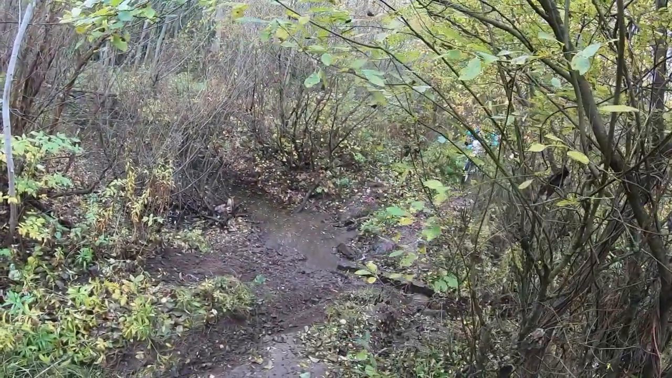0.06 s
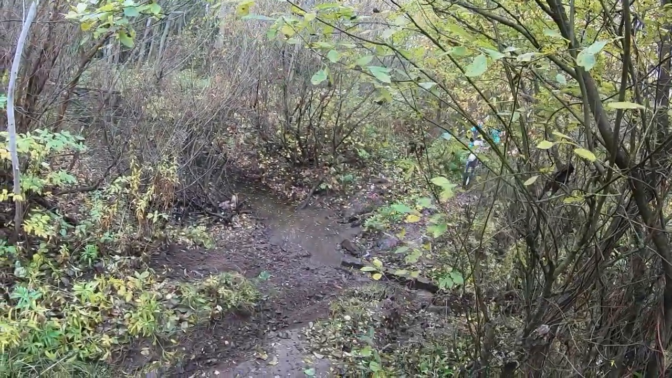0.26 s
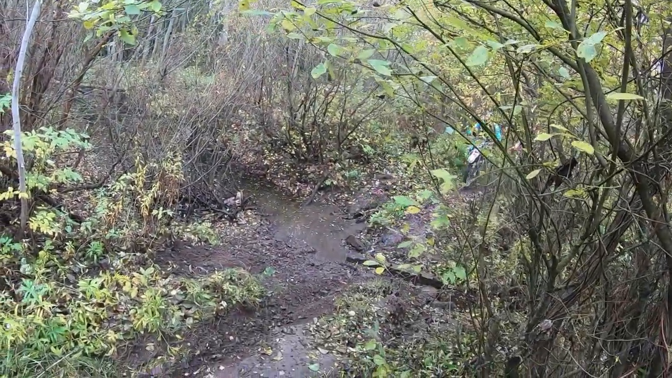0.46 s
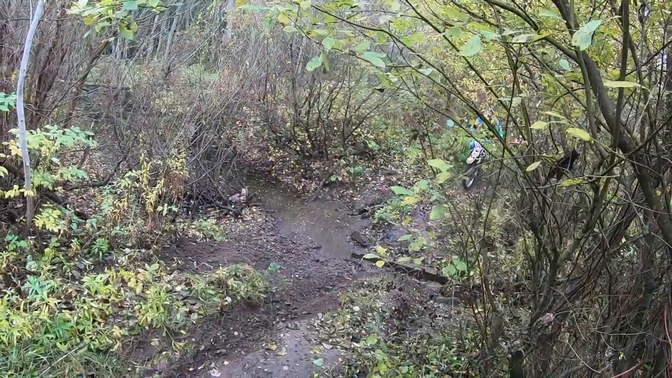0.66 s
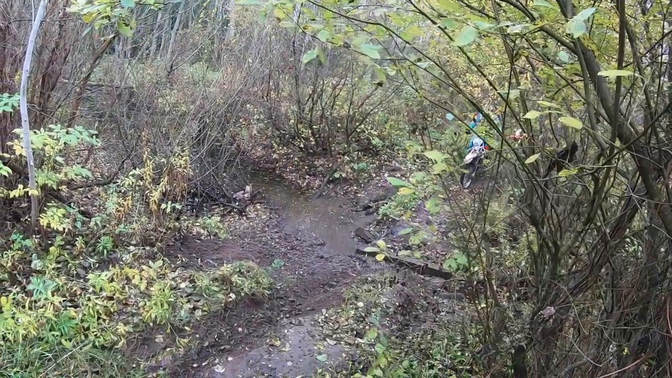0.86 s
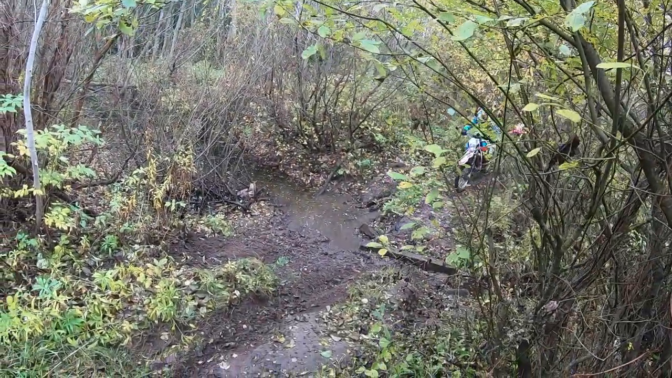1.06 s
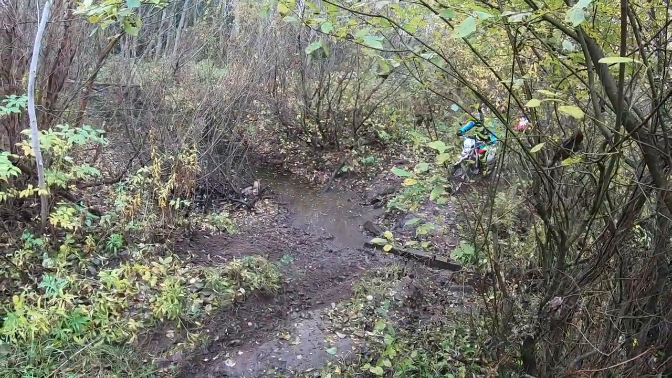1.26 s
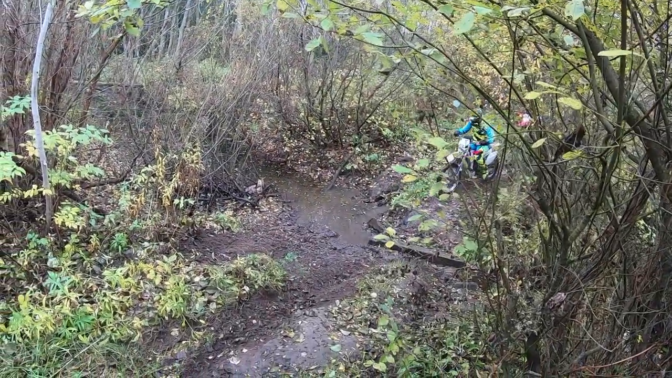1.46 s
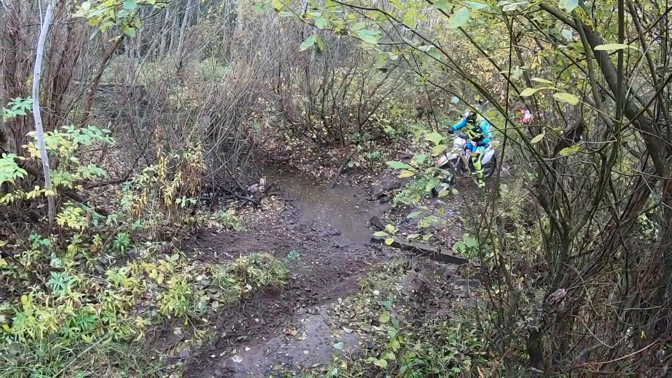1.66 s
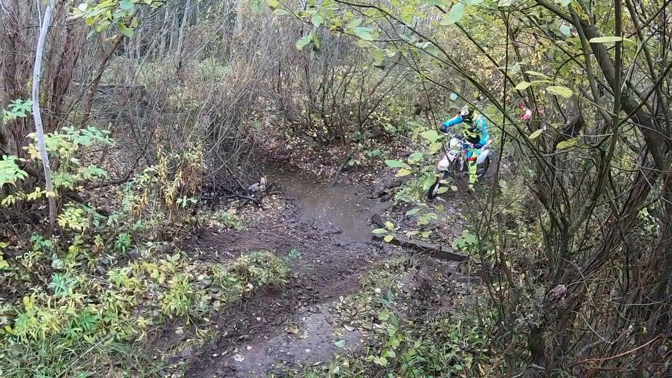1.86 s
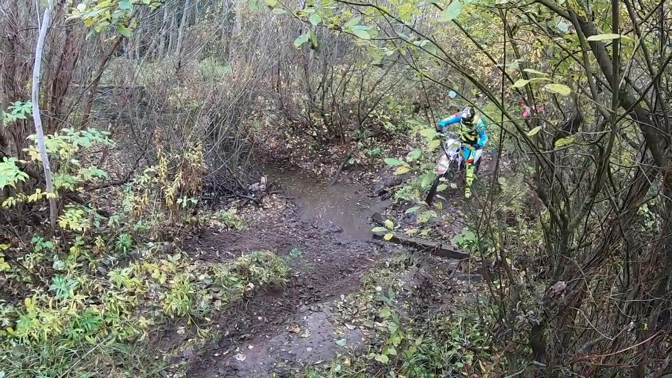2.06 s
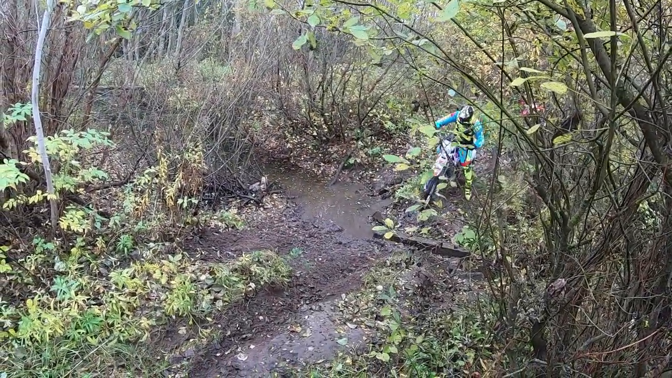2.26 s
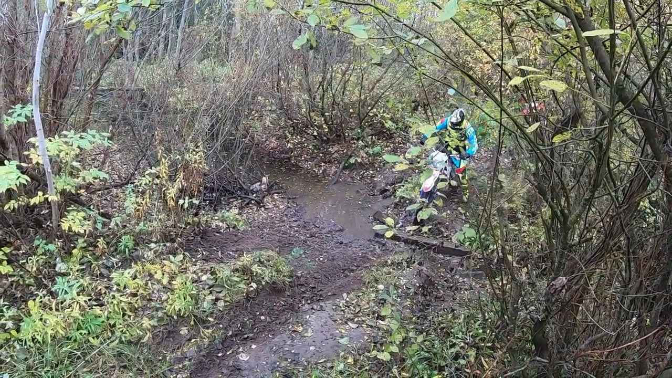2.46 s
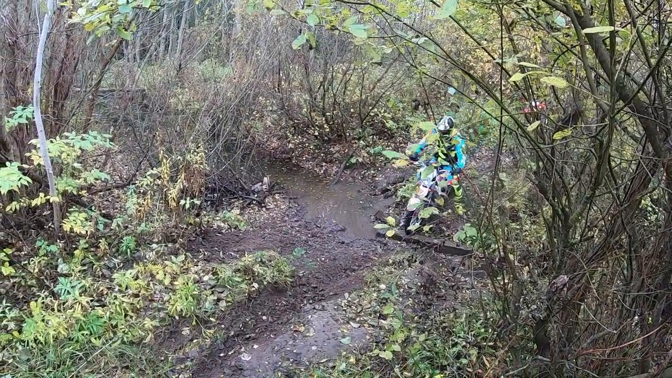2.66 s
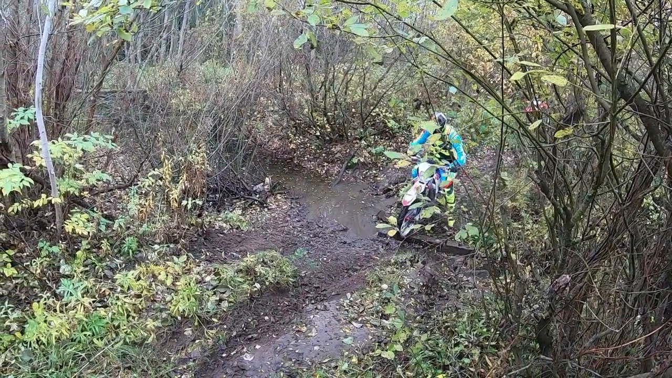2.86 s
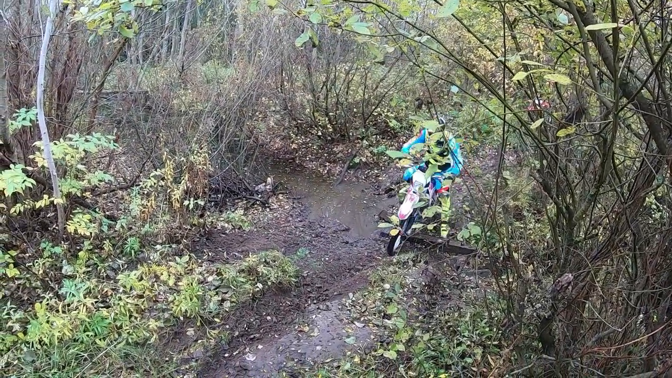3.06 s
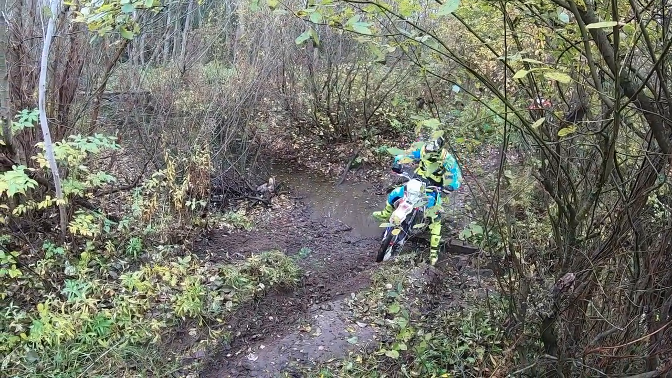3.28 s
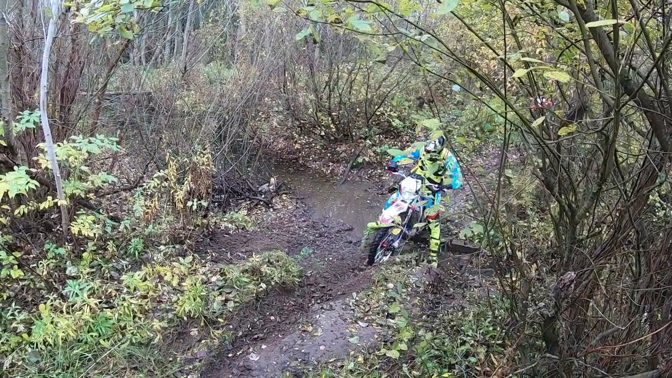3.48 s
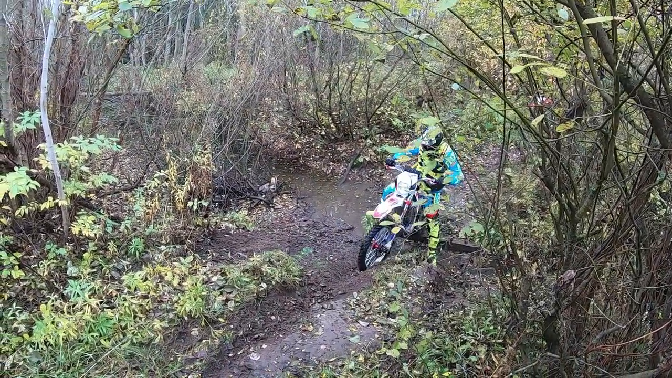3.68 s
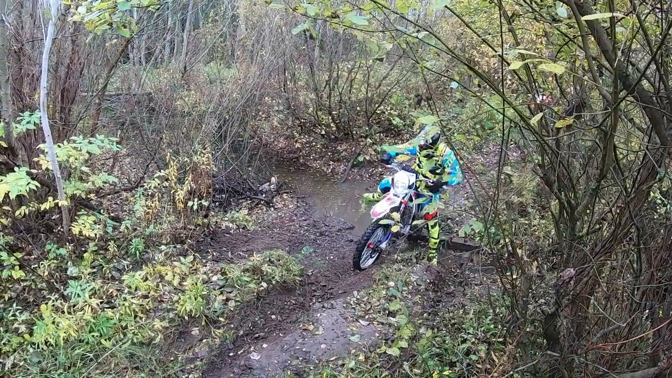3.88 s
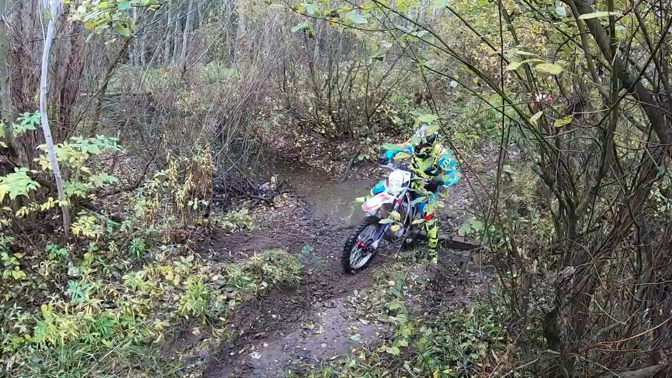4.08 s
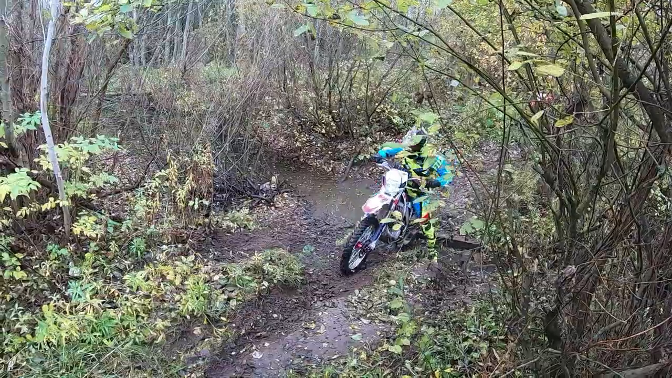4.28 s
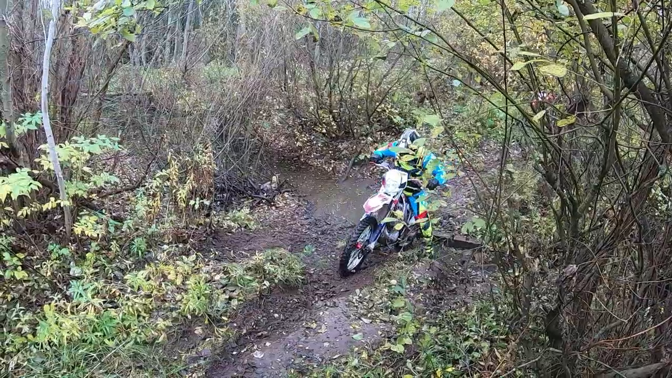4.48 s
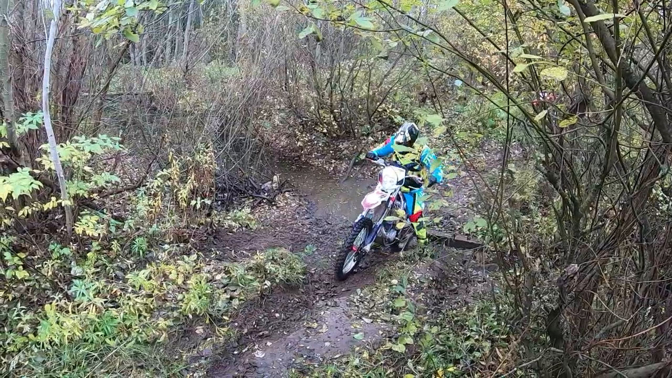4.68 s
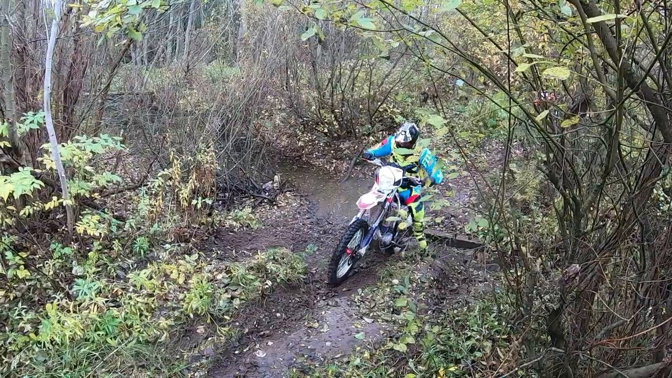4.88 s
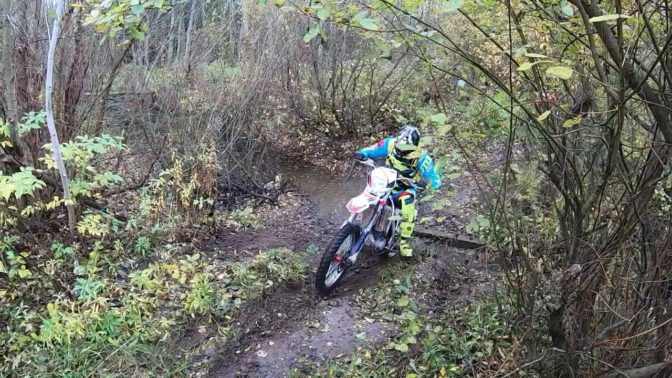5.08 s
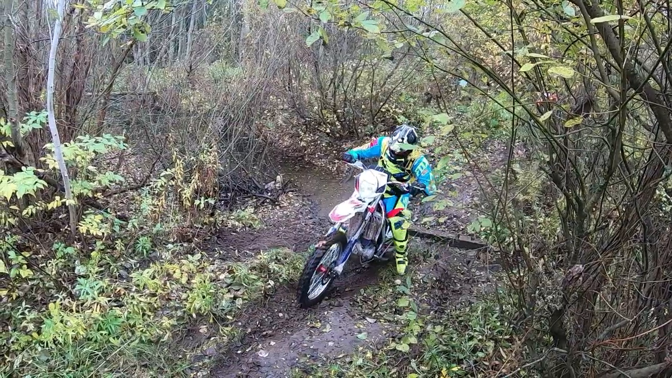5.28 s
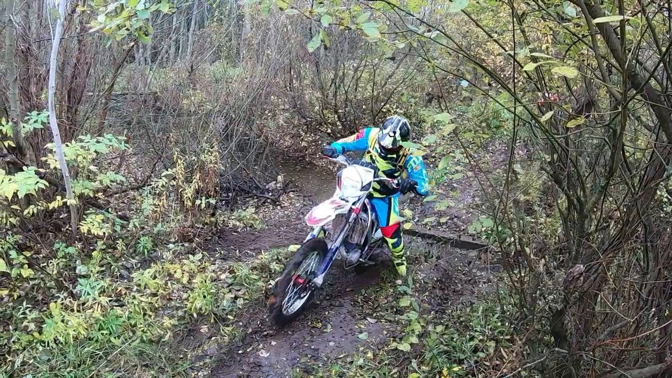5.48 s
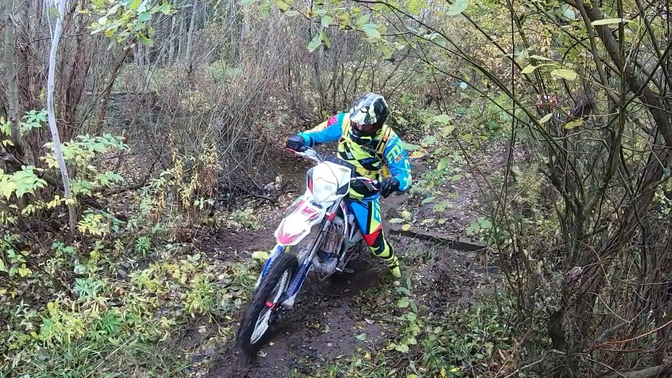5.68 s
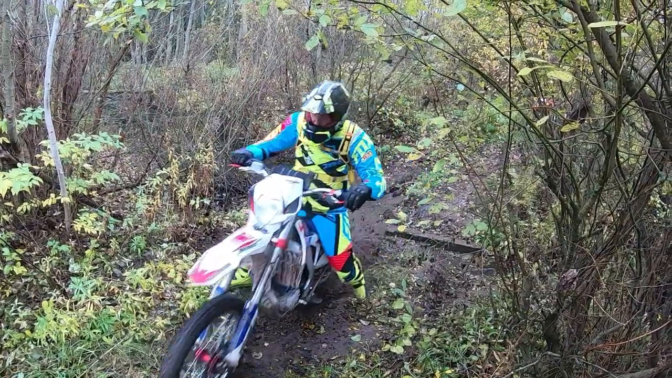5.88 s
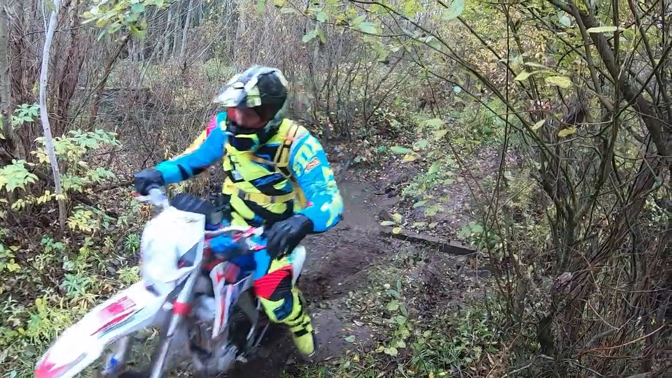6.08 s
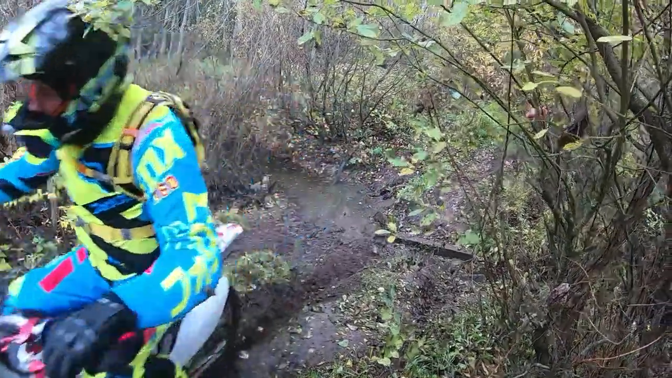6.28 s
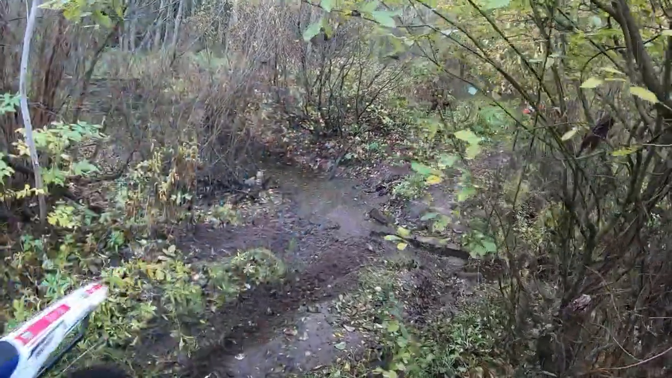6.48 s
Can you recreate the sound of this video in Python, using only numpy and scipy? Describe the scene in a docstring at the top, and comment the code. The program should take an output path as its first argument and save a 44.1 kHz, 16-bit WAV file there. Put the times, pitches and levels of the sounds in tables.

```python
"""A single-cylinder four-stroke dirt bike chugs down a muddy forest trail toward the microphone.
It almost stalls at a log, then is revved in several bursts and comes close.
Each firing is one pressure pulse, thumping and barking through the silencer; gated noise makes the rasp.
Resonant metal rattles, short hard clacks break in, a puddle froths with bubbles and a faint whine wanders.
The trees add a short echo, the mud a reflection, and a steady noise is the forest behind it all."""
import sys
import numpy as np
from scipy import signal
from scipy.fft import rfft, irfft, next_fast_len
from scipy.io import wavfile
from scipy.ndimage import uniform_filter1d, map_coordinates

SR = 44100
rng = np.random.default_rng(int(sys.argv[2]) if len(sys.argv) > 2 else 0)


def store_pcm(level_fs):
    """Save levels as 16-bit WAV."""
    pcm = np.round(np.clip(level_fs, -1, 1) * 32767).astype(np.int16)
    wavfile.write(sys.argv[1], SR, np.atleast_2d(pcm).T)


N = 288414


def amp(db):
    """Decibels to gain."""
    return 10 ** (np.asarray(db) / 20)


def unit(x):
    """Scale to rms 1."""
    return x / np.sqrt(np.mean(x ** 2) + 1e-20)


def along(points, hz):
    """Read (Hz, value) points on a log frequency axis."""
    f, v = np.transpose(points)
    return np.interp(np.log(hz + 1), np.log(f + 1), v)


def curves(rows):
    """One value per sample for each column after the time in seconds."""
    s, *cols = np.transpose(rows)
    return [np.interp(np.arange(N) / SR, s, c) for c in cols]


def filtered(x, response):
    """x times a response of frequency."""
    m = next_fast_len(N + SR // 2)
    return irfft(rfft(x, m) * response(np.fft.rfftfreq(m, 1 / SR)), m)[..., :N]


def coloured(x, spectrum):
    """x through a (Hz, dB) spectrum, at rms 1."""
    return unit(filtered(x, lambda hz: amp(along(spectrum, hz))))


# How alike left and right sound at the microphones.
# Each row: frequency in Hz, likeness from 0 (unrelated) to 1 (the same).
ALIKE = [(100, 1), (500, 0.96), (1200, 0.35), (2500, 0.79), (4500, 0.83), (8000, 0), (14000, 0.027)]


def spread(pair):
    """Two unrelated signals become left and right, alike in the bass."""
    turn = lambda hz: np.arccos(np.clip(along(ALIKE, hz), -1, 1)) / 2
    mid, side = filtered(pair, lambda hz: np.array([np.cos(turn(hz)), np.sin(turn(hz))]))
    return np.array([mid + side, mid - side])


def noise():
    """Stereo white noise, spread between the channels."""
    return spread(rng.standard_normal((2, N)))


def causal(gain):
    """The minimum-phase pulse with this spectrum: it starts sharply and rings out."""
    cepstrum = irfft(np.log(np.maximum(gain, 1e-6)))
    half = cepstrum.shape[-1] // 2
    # fold the cepstrum onto positive time
    cepstrum[..., 1:half] *= 2
    cepstrum[..., half + 1:] = 0
    return irfft(np.exp(rfft(cepstrum)))


def add(track, start, sound):
    """Mix a sound into a track at a sample."""
    part = track[..., start:start + sound.shape[-1]]
    part += sound[..., :part.shape[-1]]


def moments(cycle, angle):
    """Samples at which the engine passes this share of its cycle."""
    return np.flatnonzero(np.diff(np.floor(cycle - angle)) > 0)


def bursts(cycle, angle, decay, scatter_db):
    """An envelope kicked once a cycle, by a varying height, that dies away over decay seconds."""
    at = moments(cycle, angle)
    kicks = np.zeros(N)
    kicks[at] = amp(scatter_db * rng.standard_normal(len(at)))
    return signal.lfilter([1], [1, -np.exp(-1 / (decay * SR))], kicks)


def levelled(envelope):
    """An envelope with its slow swell taken out."""
    power = uniform_filter1d(uniform_filter1d(envelope ** 2, size=6000), size=6000)
    return envelope / np.sqrt(np.abs(power) + 1e-9)


def case(x, modes):
    """The ring of metal housings, which radiate little high treble."""
    def ring(f):
        total = 0
        for k, (centre, width, db) in enumerate(modes):
            # neighbouring modes alternate in sign
            resonance = 1j * f * width / (centre ** 2 - f * f + 1j * f * width)
            total = total + (-1) ** k * amp(db) * resonance
        return total

    return unit(filtered(x, lambda f: ring(f) / (1 + (f / 7000) ** 6)))


def held(start, end, lag):
    """An envelope that eases to 1 after start and back to 0 after end."""
    t = np.arange(N) / SR
    ease = lambda s: 1 - np.exp(-np.maximum(t - s, 0) / lag)
    return ease(start) - ease(end)


# What the rider does with the throttle.
# Each row: start in seconds, end in seconds, opening with 1 = full.
THROTTLE = [(0.184, 0.37, 0.29), (0.728, 0.944, 0.22), (2.72, 3.08, 0.28), (3.52, 3.75, 0.21),
            (3.743, 3.892, 1), (3.89, 4.1, 0.35), (4.188, 4.543, 0.75), (4.65, 4.973, 0.91),
            (4.978, 5.23, 0.61), (5.227, 5.694, 0.77), (5.697, 5.9, 0.37), (5.876, 6.403, 0.43)]
# The distance closing as the bike comes nearer through the bushes.
# Each row: time in seconds, relative gain in dB.
NEARNESS = [(0, 2.5), (.6, 2), (1.3, 2), (2.6, 5.5), (3.6, 2.5), (4.3, 7.5), (5.3, 10), (5.9, 9.5),
            (6.3, 12), (6.54, 13.5)]
THROTTLE_LAG_S = 0.026
IDLE_PER_S = 14.8  # firings per second


def loudness(law, rate):
    """Level in dB of one voice of the engine, from revs, throttle and nearness."""
    idle_db, db_per_octave, throttle_db, nearness_share = law
    opening = sum(amount * held(start, end, THROTTLE_LAG_S) for start, end, amount in THROTTLE)
    revs_db = db_per_octave * np.log2(rate / IDLE_PER_S)
    return idle_db + revs_db + throttle_db * opening + nearness_share * curves(NEARNESS)[0]


# The hush of the forest around the microphone.
# Each row: frequency in Hz, relative level in dB.
FOREST = [(20, -16), (90, 8), (200, -1), (400, -9), (900, -17.5), (2500, -22.5), (7000, -44), (10000, -35),
          (15000, -65)]


def forest(level_db):
    """Steady noise, heaviest in the bass, is the air of the place."""
    return amp(level_db) * coloured(noise(), FOREST)


# The engine's pace along the trail.
# Each row: time in seconds, firings per second.
FIRING = [(0.0, 20.08), (0.2, 18.95), (0.4, 36.06), (0.52, 35.9), (0.63, 28.19), (0.77, 18.53),
          (0.9, 25.62), (1.03, 21.07), (1.22, 14.18), (1.36, 13.78), (1.47, 10.9), (1.72, 10.34),
          (1.95, 14.97), (2.04, 11.64), (2.25, 13.19), (2.5, 12.6), (2.61, 10.93), (2.74, 12.94),
          (2.95, 20.19), (3.11, 23.6), (3.2, 18.29), (3.35, 14.42), (3.48, 15.4), (3.6, 11.67),
          (3.72, 14.55), (3.82, 33.7), (3.92, 43.34), (4.02, 36.16), (4.16, 28.26), (4.24, 37.45),
          (4.3, 46.01), (4.4, 47.78), (4.49, 53.72), (4.54, 46.76), (4.59, 38.44), (4.66, 37.29),
          (4.73, 37.87), (4.83, 52.05), (4.91, 57.24), (4.97, 60.18), (5.08, 51.77), (5.17, 46.88),
          (5.24, 47.14), (5.31, 48.47), (5.42, 52.93), (5.52, 54.86), (5.68, 50.15), (5.77, 41.1),
          (5.87, 29.73), (6.0, 29.73), (6.16, 27.64), (6.28, 30.42), (6.38, 34.05), (6.46, 24.18),
          (6.54, 25.6)]


def engine():
    """The firing rate, and its running sum: the cycles turned so far."""
    rate = curves(FIRING)[0]
    # firings lead by about 1 ms, after an offset of 0.15 cycle
    cycle = np.cumsum(rate) / SR + .001 * rate - .15
    return rate, cycle


# The low thump of the firings.
# Each row: time in seconds, relative level in dB, centre in Hz.
THUMPING = [(0.006, -24.5, 99.5), (0.257, -21, 123), (0.505, -23.5, 121), (0.625, -21, 94),
            (0.888, -19, 112), (0.928, -25, 110), (1.017, -20.5, 84.6), (1.117, -24.5, 99),
            (2.536, -22, 100.0), (2.625, -25.5, 92.0), (2.786, -20, 94), (3.004, -17.5, 104),
            (3.137, -18, 88.0), (3.438, -33.5, 85), (3.578, -20.5, 85), (3.729, -20, 89), (3.776, -16, 132),
            (4.139, -19, 119), (4.349, -18, 158), (4.452, -16.5, 112), (4.55, -20, 128), (4.574, -19, 108),
            (4.6, -20, 147), (4.86, -15.5, 121), (5.13, -20, 94), (5.299, -16, 132), (5.359, -18, 108),
            (5.492, -19, 120), (5.642, -19, 107), (5.702, -19, 146), (6.089, -17, 130.6),
            (6.42, -20.5, 117.0), (6.461, -18.0, 84.5), (6.497, -19.5, 108)]
# The silencer's voice above the thump.
# Each row: time in seconds, relative bark level in dB, bark centre in Hz, relative bray level in dB.
BARKING = [(0.006, -42.5, 250, -53.5), (0.332, -34.5, 248, -53), (0.753, -42.5, 270, -53.5),
           (0.888, -38.5, 280, -40.5), (1.017, -50, 270, -60), (1.247, -47, 244, -58),
           (2.066, -37.5, 220.0, -60.5), (2.625, -43, 241, -57.5), (3.05, -34.5, 273, -46.2),
           (3.242, -54.5, 274.0, -59), (3.729, -28.5, 239, -53), (3.868, -15, 301, -28),
           (3.893, -29.5, 234.0, -41), (3.965, -23.2, 212.0, -37), (4.017, -40, 238, -38.5),
           (4.174, -31, 237.0, -49.8), (4.234, -21.5, 291, -30.5), (4.55, -22.5, 290, -29.5),
           (4.574, -26.5, 230, -39.5), (4.822, -16.5, 305, -29.5), (4.965, -22.6, 265, -35.5),
           (5.052, -19.5, 244, -31), (5.193, -21, 293, -36), (5.379, -12.5, 250, -33),
           (5.418, -16.5, 279.0, -39.5), (5.723, -18.5, 257, -34.5), (5.769, -17.5, 208, -35),
           (5.822, -28.0, 270, -37.5), (6.358, -24.5, 298, -31.5), (6.461, -29.5, 286, -37.5),
           (6.497, -24.5, 265, -36.3)]
# Pulse shapes that slide with their centre.
# Each row: frequency as a multiple of the centre, relative level in dB.
THUMP = [(.12, -38), (.25, -23), (.42, -9), (.7, -2), (1, -0.5), (1.3, -1.5), (1.55, -9), (1.85, -15.5),
         (2.4, -28), (5, -70), (12, -140)]
BARK = [(.4, -52), (.58, -16), (.74, 1.5), (1, 0.5), (1.2, -1.5), (1.36, -8), (1.55, -24), (2.4, -57),
        (6, -140)]
# Pulse shapes that stay put.
# Each row: frequency in Hz, relative level in dB.
BRAY = [(250, -50), (390, -6), (460, 4.5), (565, 1.5), (660, -14.5), (1000, -36), (2000, -90), (4000, -140)]
CRACK = [(300, -41), (520, -14), (670, 4), (900, 1), (1130, 2.5), (1300, -1), (1600, -3), (4000, -26.5),
         (9000, -110)]
# How loud the crack grows.
# The row: idle level in dB, dB per octave of revs, dB at full throttle, share of the nearness.
CRACK_LAW = (-65, 6, 16, 1.08)
# below this many firings per second the resonances narrow, by these powers
WIDE_PER_S, THUMP_NARROWS, BARK_NARROWS = 39.6, 0.14, 0.48


def exhaust(cycle, rate, thump_db, bark_db, bray_db, scatter_db, size=8192):
    """One pressure pulse per firing: thump, bark and bray, and a sharp crack as the throttle opens."""
    hz = np.fft.rfftfreq(size, 1 / SR)
    at = moments(cycle, 0)
    controls = curves(THUMPING) + curves(BARKING) + [loudness(CRACK_LAW, rate)]
    thump, thump_centre, bark, bark_centre, bray, crack = [c[at][:, None] for c in controls]
    slow = np.maximum(WIDE_PER_S / rate[at], 1)[:, None]
    thump_shape = along(THUMP, (hz / thump_centre) ** (slow ** THUMP_NARROWS))
    bark_shape = along(BARK, (hz / bark_centre) ** (slow ** BARK_NARROWS))
    voices = [(thump_shape, thump + thump_db), (bark_shape, bark + bark_db),
              (along(BRAY, hz), bray + bray_db), (along(CRACK, hz), crack)]
    power = 0
    for shape, db in voices:
        # each shape is scaled to mean power 1 before its level
        power = power + amp(shape + db) ** 2 / np.mean(amp(shape) ** 2, axis=-1, keepdims=True)
    pulses = causal(np.sqrt(power))
    # slow running burns unevenly
    unevenness = (rate.min() / rate[at]) ** 2
    strength = amp(scatter_db * unevenness * rng.standard_normal(len(at)))
    out = np.zeros(N)
    for start, pulse in zip(at, pulses * strength[:, None]):
        period = SR / rate[start]
        add(out, start, pulse * np.sqrt(period))
    return out


def chambers(x, delay, bounce):
    """Reflections inside the silencer spread each pulse in time without colouring it (an all-pass)."""
    trip = lambda hz: np.exp(-2j * np.pi * hz * delay)
    return filtered(x, lambda hz: (bounce + trip(hz)) / (1 + bounce * trip(hz)))


# Torn gas and top-end sizzle.
# Each row: frequency in Hz, relative level in dB.
GAS = [(300, -6), (500, -6.5), (650, -9), (930, -5.5), (1100, -3.5), (1300, -3), (1500, 1.5), (1950, -1.5),
       (2210, -10.5), (2760, -2), (3360, -9.5), (4020, -5), (4600, -11.5), (5500, -14.5), (8000, -50)]
SIZZLE = [(2500, -14), (4300, -9.5), (5300, -5.5), (6700, 0.5), (7700, -1), (8400, -10), (9700, -6.5),
          (10400, -12), (11300, -21.5), (14000, -26), (15600, -45)]
# Engine case resonances.
# Each row: centre in Hz, width in Hz, relative level in dB.
CASE = [(1090, 98, -9), (1394, 115, 7), (1996, 270, 5), (3040, 420, 5.5), (4020, 5300, -9.5)]
# How loud rasp and sizzle grow.
# The row: idle level in dB, dB per octave of revs, dB at full throttle, share of the nearness.
RASP_LAW = (-50, 3.5, 11.5, 1)
SIZZLE_LAW = (-63, 2.5, 10.5, 1.28)


def rasp(cycle, rate, gas_db, ring_db, sizzle_db, steady, ticks):
    """Gas tears out after each firing while valves tick against the cases."""
    body, top = loudness(RASP_LAW, rate), loudness(SIZZLE_LAW, rate)
    blow = bursts(cycle, angle=0.054, decay=0.0038, scatter_db=3.5)
    valves = bursts(cycle, angle=0.58, decay=0.0031, scatter_db=5.5)
    valves = valves + bursts(cycle, angle=0.87, decay=0.0063, scatter_db=3.0)
    gate = levelled(steady + blow + ticks * valves)
    gas = amp(gas_db) * coloured(gate * noise(), GAS)
    ring = amp(ring_db) * case(gate * noise(), CASE)
    sizzle = amp(top + sizzle_db) * coloured(gate * noise(), SIZZLE)
    return amp(body) * (gas + ring) + sizzle


# Header pipe resonances.
# Each row: centre in Hz, width in Hz, relative level in dB.
HEADER = [(540, 160, -8.5), (1103, 78, 5), (1520, 230, -17), (1810, 120, -7)]


def knock(cycle, rate, level_db):
    """Combustion strikes the header pipe nearly alike every cycle, so it sings at high revs."""
    blows = levelled(bursts(cycle, angle=0.09, decay=0.00005, scatter_db=1))
    level = amp(loudness(RASP_LAW, rate) + level_db)
    return level * (rate / rate.max()) ** 2 * case(blows, HEADER)


# Spells in which the engine lugs and the drive train lashes.
# Each row: start in seconds, end in seconds, relative level in dB.
LUGS = [(2.803, 3.19, -56), (5.9, 6.322, -25.5)]
# Gear and chain guard resonances.
# Each row: centre in Hz, width in Hz, relative level in dB.
GEARS = [(1420, 82, 8.5), (1920, 126, 10), (2540, 130, 1), (3270, 340, 4.5), (3950, 4300, -14)]
# The rattle of the frame, also the body of the clacks.
# Each row: frequency in Hz, relative level in dB.
CHASSIS = [(200, -28), (700, 1), (1400, 8.5), (2200, 4), (3100, 3.5), (4200, 0.5), (6000, -9), (10000, -16),
           (13000, -76)]
LUG_LAG_S, SLACK_DB = 0.015, -55  # how fast the lash comes and goes; relative level always present


def lash(cycle, level_db, rattle):
    """As the engine lugs, gears and chain rattle before and just after each firing."""
    gate = bursts(cycle, angle=0.8, decay=0.01, scatter_db=1.5)
    gate = gate + 0.5 * bursts(cycle, angle=0.023, decay=0.0035, scatter_db=2)
    shake = levelled(gate) * noise()
    load = amp(SLACK_DB) + sum(amp(db) * held(start, end, LUG_LAG_S) for start, end, db in LUGS)
    metal = unit(case(shake, GEARS) + rattle * coloured(shake, CHASSIS))
    return amp(level_db) * load * metal


# The faint wandering whine of the distant bike.
# Each row: time in seconds, frequency in Hz, level in dB.
WHINE = [(0, 1585, -47), (.2, 1520, -46), (.4, 1430, -54), (.68, 1330, -49), (.76, 1450, -50),
         (.85, 1950, -49), (1.04, 1860, -57), (1.2, 1750, -66), (1.4, 1700, -100)]


def whine(width_hz, overtone):
    """A sine and its octave, each made fuzzy by a slow random waver."""
    hz, db = curves(WHINE)
    angle = 2 * np.pi * np.cumsum(hz) / SR
    waver = unit(filtered(rng.standard_normal((2, N)), lambda f: 1 / (1 + (f / width_hz) ** 2)))
    return amp(db) * (waver[0] * np.sin(angle) + overtone * waver[1] * np.sin(2 * angle))


def ground(x, delay, share):
    """The reflection off the mud lags more as the bike nears, so its notches slide down."""
    lag = delay * SR * amp(curves(NEARNESS)[0])
    reflection = np.array([map_coordinates(side, [np.arange(N) - lag]) for side in x])
    return (x + share * reflection) / np.hypot(1, share)


# Echo among the trunks.
# Each row: frequency in Hz, time to fall 60 dB in seconds.
TREES = [(80, 0.59), (300, 0.34), (2000, 0.15), (10000, 0.15)]


def trees(x, size=16384):
    """Trunks and undergrowth scatter a short tail that changes as the bike moves on."""
    out, padded = np.zeros((2, N + size)), np.pad(x, size)
    hop = size // 2
    for start in range(0, N + hop, hop):
        # a fresh tail of noise, fading at its own pace in each band
        hz, t, z = signal.stft(rng.standard_normal((2, SR // 2)), SR, nperseg=256)
        fade = amp(-60 * t / along(TREES, hz)[:, None])
        tail = signal.istft(z * fade, SR, nperseg=256)[1]
        tail = tail / np.linalg.norm(tail[0])
        piece = padded[start + hop:][:size] * np.sqrt(np.hanning(size))
        # the echo sets in 12.5 ms late
        add(out, start + SR // 80, signal.fftconvolve(piece[None], tail, axes=1))
    return spread(out[:, hop:][:, :N])


# Short hard clacks: some fall on sharp engine firings, others are knocks of chain and frame.
# Each row: time in seconds, relative level in dB, treble against that level in dB, time to fall 60 dB
# in seconds.
CLACKS = [(.212, -18.5, -22, 0.016), (0.259, -19, -25, .02), (0.299, -21, -23, 0.013),
          (2.195, -20, -22, 0.04), (3.065, -19.5, -7.5, 0.035), (3.321, -27.5, -17, 0.11),
          (3.374, -27.5, -13, 0.13), (3.405, -22, -10, 0.053), (3.524, -27, -14.5, 0.093),
          (3.546, -15, -14, 0.03), (3.817, -17.5, -18.5, 0.15), (3.866, -19.5, -10.5, 0.12),
          (4.092, -14, -15, 0.03), (4.307, -14, -10, 0.032)]


def clacks(level_db, treble_db, attack):
    """Short hard bursts of noise, each with a body and a treble part that die away together."""
    t = np.arange(SR // 3) / SR
    low, high = np.zeros((2, N))
    for s, db, bright_db, t60 in CLACKS:
        fade = amp(db - 60 * t / t60) * (1 - np.exp(-t / attack))
        add(low, round(s * SR), fade)
        add(high, round(s * SR), fade * amp(bright_db))
    body = amp(level_db) * low * coloured(noise(), CHASSIS)
    return body + amp(treble_db) * high * coloured(noise(), SIZZLE)


# The tyres churn through water.
# The row: start in seconds, end in seconds, level in dB.
PUDDLE = (0.25, 0.615, -44.5)
PUDDLE_LAG_S = 0.051


def puddle(bubble_hz, width, cycles, count=5000):
    """Churned water: a froth of short decaying bubbles whose pitch rises."""
    t = np.arange(SR // 50) / SR
    chance = rng.standard_normal((count, 2))
    turns = bubble_hz * np.exp(width * chance[:, :1]) * t
    tones = np.sin(2 * np.pi * turns * (1 + 10 * t))
    grains = amp(4.6 * chance[:, 1:]) * tones * np.exp(-turns / cycles)
    where = rng.integers(0, N, (count, 1)) + np.arange(len(t))
    froth = unit(np.bincount(where.ravel(), grains.ravel(), N)[:N])
    start, end, db = PUDDLE
    return amp(db) * held(start, end, PUDDLE_LAG_S) * froth


def scene():
    """The bike comes out of the wood's echo as it nears."""
    rate, cycle = engine()
    pipe = exhaust(cycle, rate, thump_db=-0.1, bark_db=-1.65, bray_db=-1.0, scatter_db=3.0)
    pipe = chambers(pipe, delay=0.002, bounce=0.79)
    metal = rasp(cycle, rate, gas_db=-3.0, ring_db=-7.5, sizzle_db=0.5, steady=0.81, ticks=0.29)
    metal = metal + knock(cycle, rate, level_db=-14.0)
    metal = metal + lash(cycle, level_db=-2.5, rattle=0.51)
    metal = metal + clacks(level_db=-5.0, treble_db=-2.5, attack=0.0024)
    # the metal leans slightly to the left
    metal = ground(metal, delay=0.000447, share=0.12) * amp([[.9], [-.9]])
    rest = metal + puddle(bubble_hz=980, width=0.26, cycles=1.6) + whine(width_hz=45, overtone=0.4)
    # Each row: time in seconds, exhaust in dB, echo of the exhaust in dB, echo of the rest in dB.
    pipe_db, pipe_wet, rest_wet = curves([
        (0, -2, -7, -6.5), (2.3, -2.8, -7, -4.5), (2.9, -1, -11, -5.5),
        (3.8, 0, -20, -13), (6.54, 0, -21, -12)])
    pipe = amp(pipe_db) * pipe
    echo = trees(amp(pipe_wet) * pipe + amp(rest_wet) * rest.mean(axis=0))
    return pipe + rest + echo + forest(level_db=-37.5)


TOP_HZ = 15600


def record(dry):
    """The microphone's band limit: nothing passes from TOP_HZ up."""
    return filtered(dry, lambda hz: hz < TOP_HZ)


dry = scene()
out = record(dry)
store_pcm(out)
```